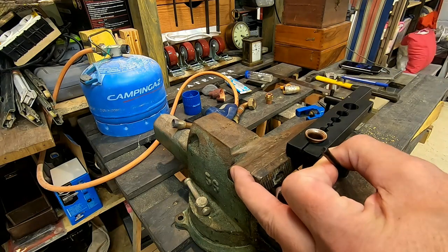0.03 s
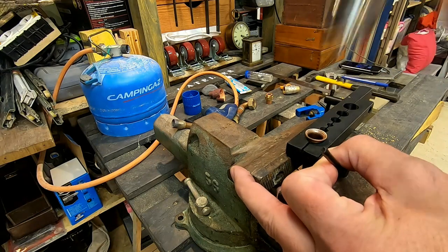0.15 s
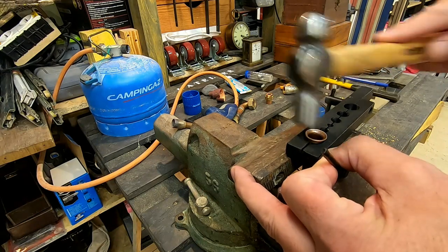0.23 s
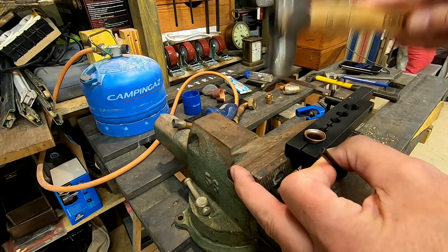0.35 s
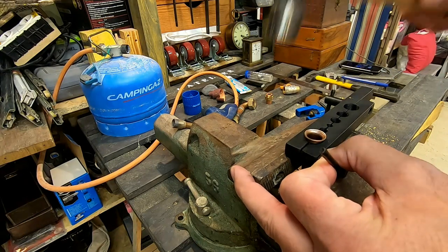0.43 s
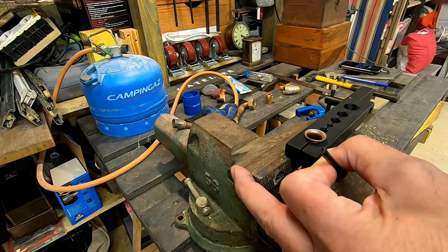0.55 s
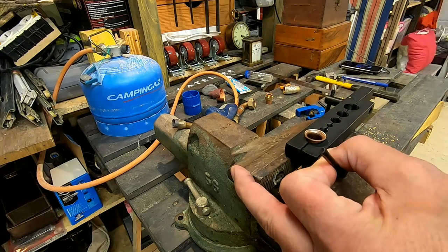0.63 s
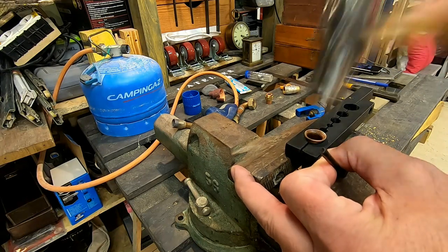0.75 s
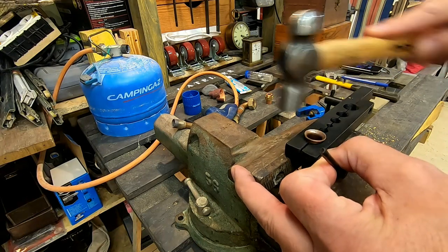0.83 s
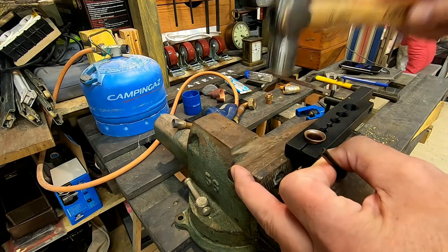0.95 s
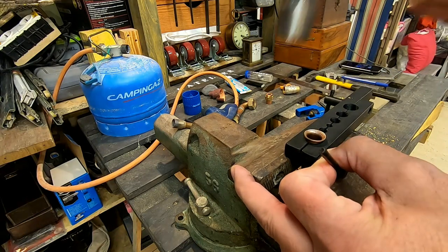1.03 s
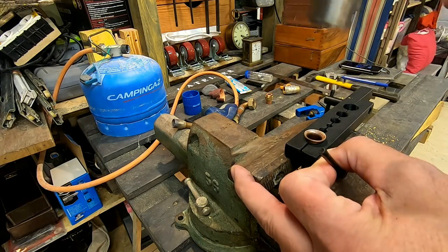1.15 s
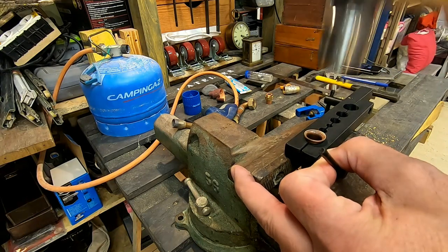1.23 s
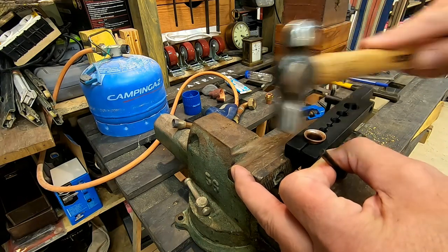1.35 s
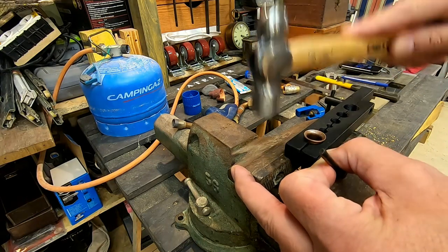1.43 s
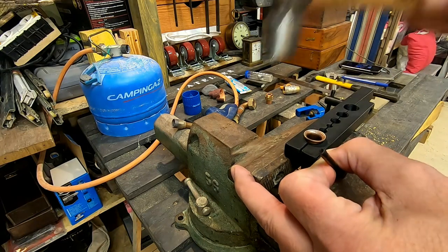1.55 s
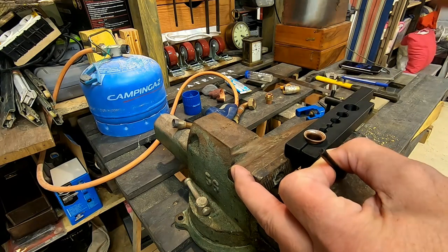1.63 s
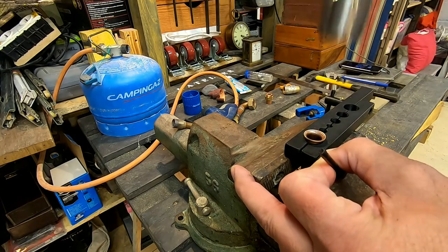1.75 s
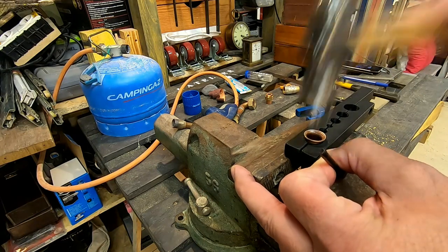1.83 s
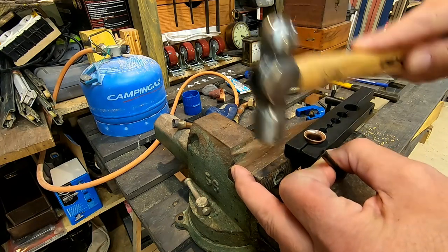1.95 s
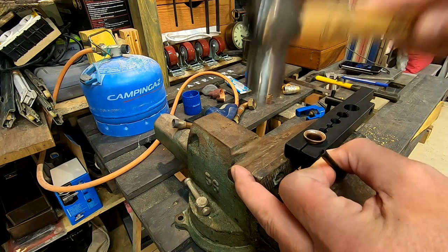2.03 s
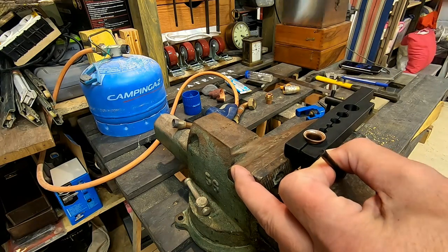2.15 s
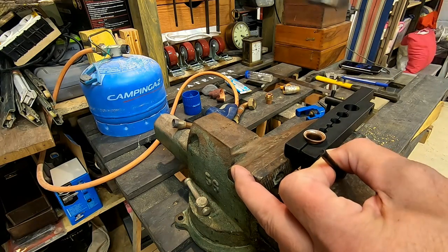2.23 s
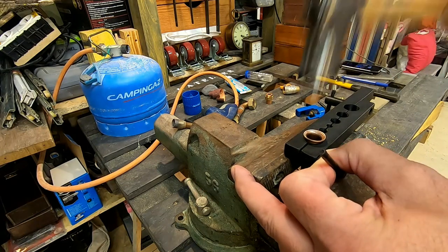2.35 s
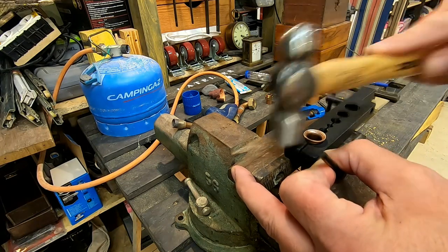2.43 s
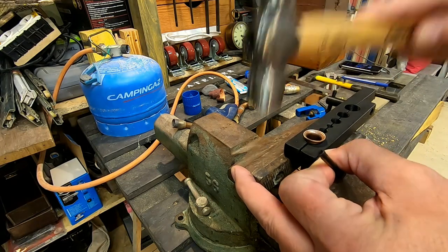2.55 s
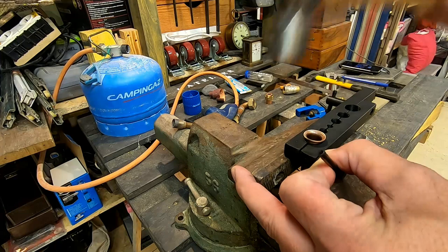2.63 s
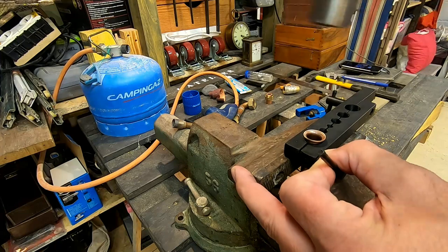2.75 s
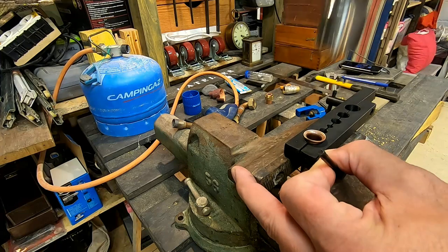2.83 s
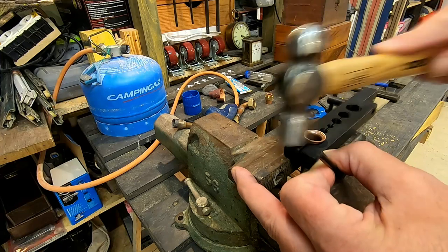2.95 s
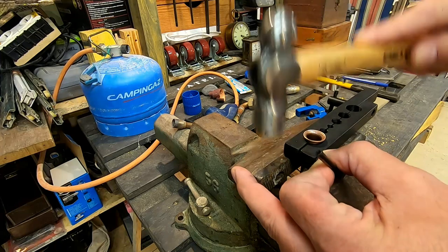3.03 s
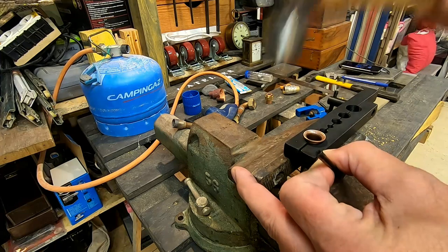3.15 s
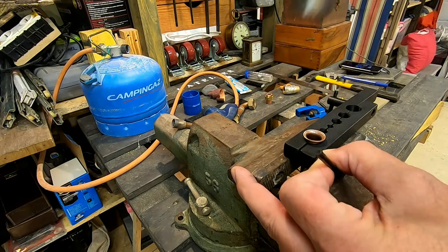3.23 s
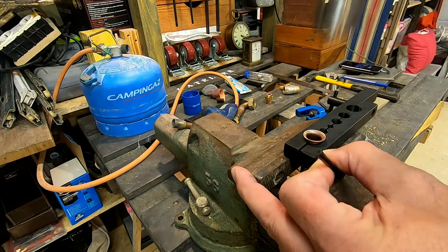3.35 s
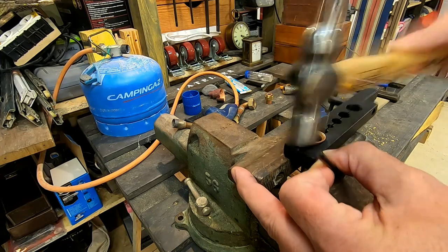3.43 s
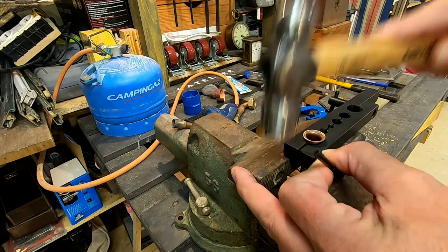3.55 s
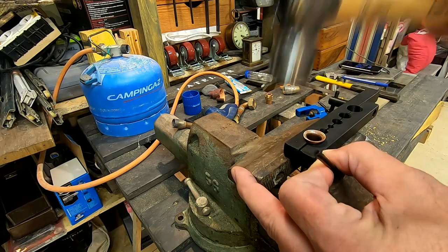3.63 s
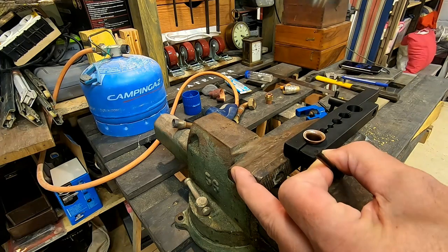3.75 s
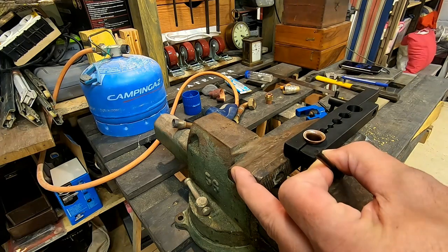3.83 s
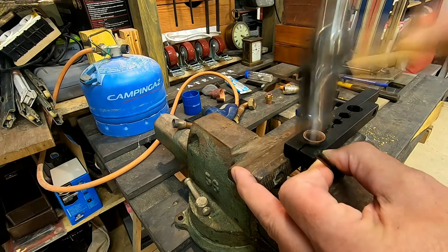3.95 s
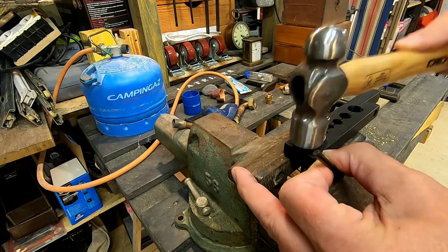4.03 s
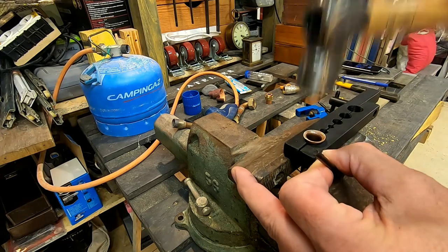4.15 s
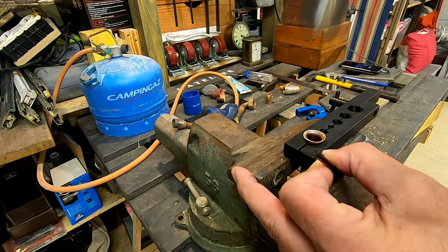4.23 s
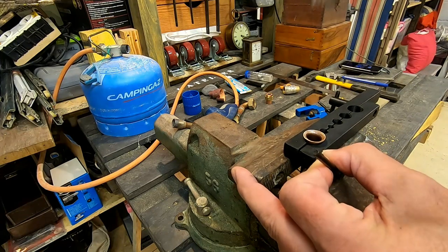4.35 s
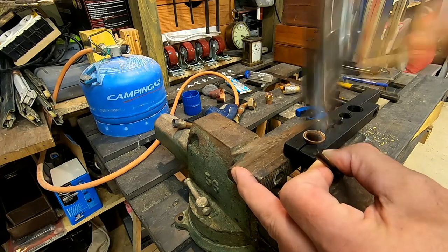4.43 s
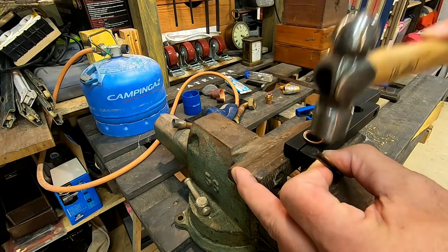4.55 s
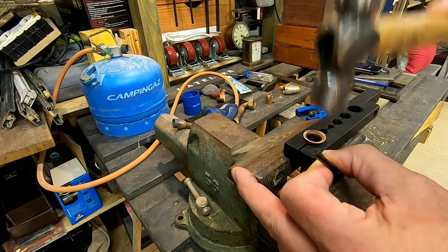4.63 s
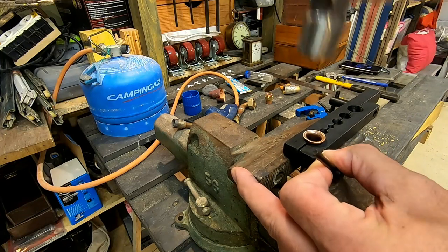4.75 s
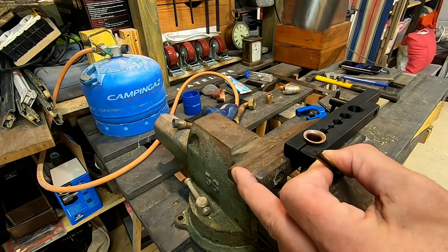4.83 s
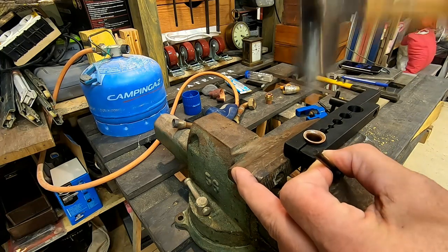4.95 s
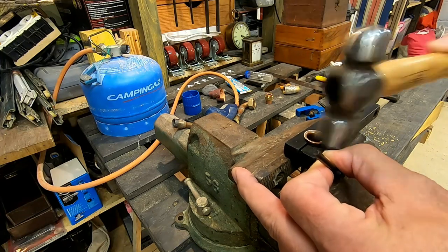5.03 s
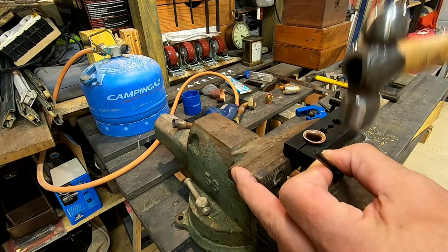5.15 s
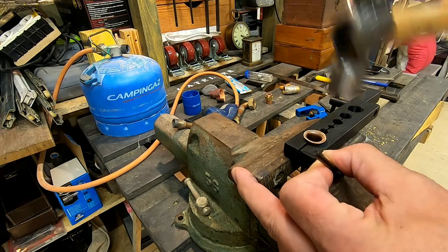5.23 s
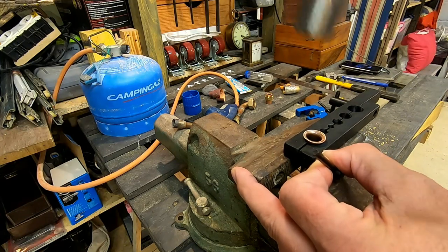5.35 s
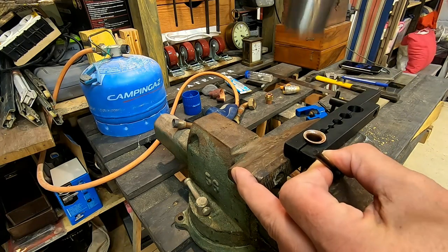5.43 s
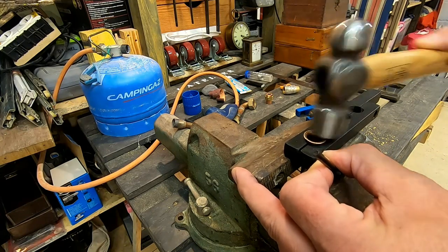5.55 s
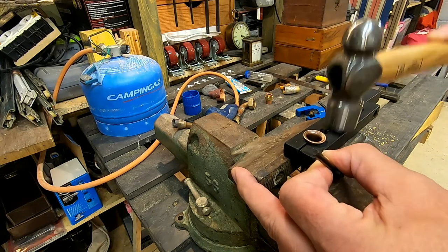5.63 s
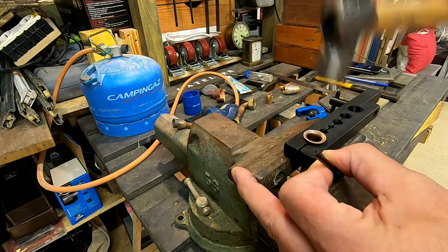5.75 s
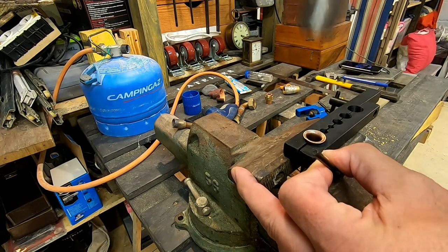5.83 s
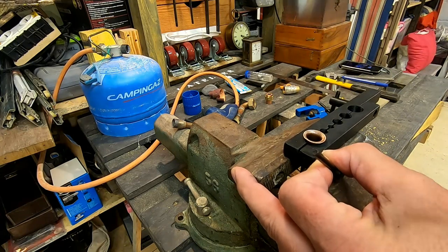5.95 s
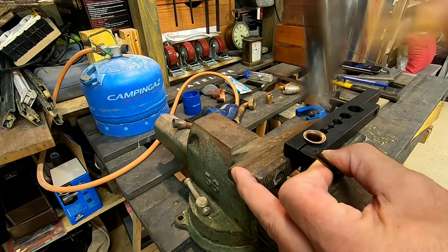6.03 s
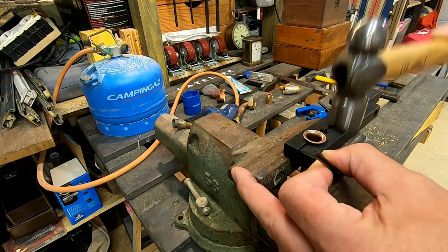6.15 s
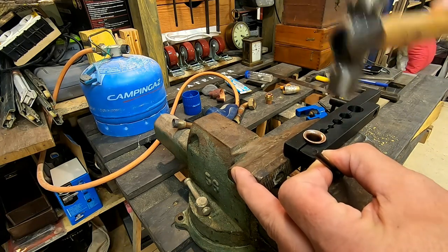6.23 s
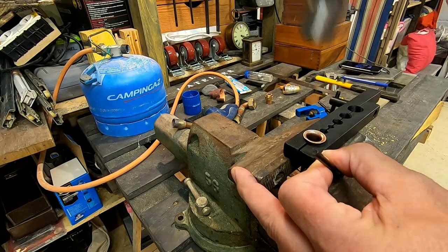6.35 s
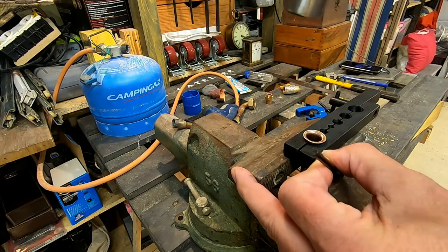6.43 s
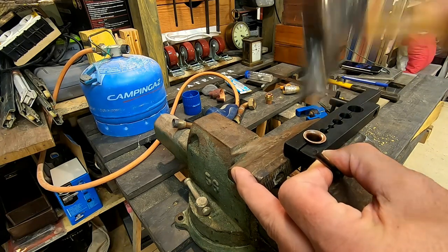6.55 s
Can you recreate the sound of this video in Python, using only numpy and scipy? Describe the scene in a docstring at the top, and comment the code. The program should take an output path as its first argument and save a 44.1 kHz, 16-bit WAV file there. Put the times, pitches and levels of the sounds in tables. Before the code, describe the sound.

Steady, sharp hammer blows on clamped metal, about two a second, each with a short clank, rattling clamp clinks and a dull bench knock.

```python
"""A small steel hammer flares the end of a copper tube held in a steel clamp in a bench vice: twelve blows.
Each blow layers shaped noise for crack, clank and room over the decaying sines of rig and hammer head.
After most, the clamp chatters in the jaws: short noise bursts and sines of its own.
The bench rocks in dull noise knocks, small things on it rattle, and loose tools ring on as faint sines.
Underneath, all noise: steady workshop air, a hand rustle that swells and fades, a thin flickering hiss."""
import sys
import numpy as np
from scipy import signal
from scipy.fft import rfft, irfft
from scipy.io import wavfile

SR = 44100
rng = np.random.default_rng(int(sys.argv[2]) if len(sys.argv) > 2 else 0)


def to_wav(sig):
    """Store sig (one row per channel, or 1-D mono) as 16-bit WAV at the path in sys.argv[1].

    Samples outside -1..1 are clipped; the rate is SR.
    """
    pcm = np.clip(np.atleast_2d(sig), -1, 1) * 32767
    pcm = np.round(pcm).astype(np.int16)
    wavfile.write(sys.argv[1], SR, pcm.T)  # frames by channels


N = 290178
SPAN = 32768  # samples for one contact to die away
AGE = np.arange(SPAN) / SR  # seconds since the contact
BODY_HZ, CLANG_HZ, EDGE_HZ = 1420, 2900, 6200  # where one contact differs in colour from the next


def from_db(db):
    """Decibels to gain."""
    return 10 ** (np.asarray(db) / 20)


def at_hz(points, hz):
    """Read a table on a log-frequency axis."""
    known_hz, values = np.transpose(points)
    return np.interp(np.log(np.maximum(hz, 1)), np.log(known_hz), values)


def add(out, s, sound):
    """Mix a sound in from a given time in seconds."""
    start = int(round(s * SR))
    size = max(0, min(sound.shape[-1], N - start))
    out[:, start:start + size] += sound[:, :size]


# left level minus right level: [f/Hz, level/dB]
LEFT_OVER_RIGHT = [(60, -3.4), (170, -3.8), (330, -6), (520, -9), (820, -8), (970, -1.5), (1900, -3.5),
                   (3000, -1.7), (4200, -2), (5800, -4.5), (9000, 2.5), (13000, -1.4)]
# phase by which the left side leads: [f/Hz, phase/rad]
LEFT_LEAD = [(170, -.15), (330, -.2), (600, .35), (950, 1.2), (1400, .7), (1900, 1.1), (2700, .6),
             (4400, .3), (5500, -.3), (8000, -.6), (10500, -1.5), (12500, -2.1)]


def panned(hz):
    """Complex left and right gains: the two sides differ in level and phase at each frequency."""
    half = np.array([[.5], [-.5]])
    level = from_db(at_hz(LEFT_OVER_RIGHT, hz) * half)
    phase = at_hz(LEFT_LEAD, hz) * half
    return level * np.exp(1j * phase)


# left-right likeness of near sound, before panning: [f/Hz, correlation]
NEAR_LIKENESS = [(200, 0.96), (700, 0.3), (1500, .98), (3000, .94), (6000, 0.76), (10000, .65)]
# left-right likeness of diffuse sound, before panning: [f/Hz, correlation]
DIFFUSE_LIKENESS = [(170, .98), (350, .88), (700, .5), (1500, .45), (3000, .6), (6000, .45), (10000, .3)]


def noise(spectrum, likeness, size, colour=((1, 0), (2, 0))):
    """Stereo noise: a spectrum levelled to unit rms gain, then tinted by a colour in dB and panned."""
    hz = np.arange(size // 2 + 1) * SR / size
    gain = from_db(at_hz(spectrum, hz))
    gain = gain / np.sqrt(np.mean(gain ** 2))
    gain = gain * from_db(at_hz(colour, hz))
    alike = np.clip(at_hz(likeness, hz), -1, 1)
    mid, side = rfft(rng.standard_normal((2, size)))
    opposite = np.array([[1], [-1]])
    pair = np.sqrt((1 + alike) / 2) * mid + np.sqrt((1 - alike) / 2) * side * opposite
    return irfft(pair * gain * panned(hz), size)


def fade(t60, rise_s, hold_s=0):
    """Swell, hold, then die away exponentially."""
    swell = np.minimum(AGE / rise_s, 1) ** 2
    decay_db = -60 * np.maximum(AGE - hold_s, 0) / t60
    return swell * from_db(decay_db)


def mode_shapes(modes, rise_s):
    """One decaying stereo sine a mode, each starting at a random phase of its own."""
    shapes = []
    for hz, db, t60 in modes:
        turns = hz * AGE + rng.random()
        sine = np.real(panned(hz) * np.exp(2j * np.pi * turns))
        shapes.append(from_db(db) * fade(t60, rise_s) * sine)
    return np.array(shapes)


def ring(modes, shapes, colour, scatter_db):
    """Each contact strikes every mode with a strength of its own."""
    strength_db = at_hz(colour, np.array(modes)[:, 0]) + scatter_db * rng.standard_normal(len(modes))
    return np.tensordot(from_db(strength_db), shapes, axes=1)


# still air of the workshop: [f/Hz, relative level/dB per Hz]
STILL_AIR = [(15, -39), (25, -7), (95, -18), (181, 1.5), (264, -6), (415, -11), (488, -15), (729, -12.5),
             (952, -12), (1350, -13.5), (1760, -16.5), (5140, -30), (7090, -26), (11200, -45),
             (15000, -60.5)]
# rustle of the hands: [f/Hz, relative level/dB per Hz]
HAND_RUSTLE = [(100, -6.5), (250, 1), (600, -7), (1400, -0.5), (3200, -10), (4500, -20.5), (10000, -25.5),
               (12000, -38.5)]
# the hands shift on clamp and handle: [middle t/s, length/s, peak level/dB]
HAND_SHIFTS = [(0.275, .18, -60), (.58, 0.38, -69.5), (1.27, 0.18, -69.5), (2.98, 0.56, -63.5),
               (4.5, 3, -71.5), (6.25, .6, -68.5)]
# thin flickering hiss: [f/Hz, relative level/dB per Hz]
THIN_HISS = [(5500, -38), (6600, -4), (7200, 3), (7800, -9), (9000, -40)]


def background():
    """Still air, hands whose rustle swells and fades with each shift, and a hiss of random flickering level."""
    t = np.arange(N) / SR
    movement = np.zeros(N)
    for middle_s, length_s, db in HAND_SHIFTS:
        swell = np.cos(np.pi * np.clip((t - middle_s) / length_s, -.5, .5))
        movement += from_db(db) * swell
    hands = movement * noise(HAND_RUSTLE, DIFFUSE_LIKENESS, N)
    flicker_db = np.interp(t, np.linspace(0, t[-1], num=500), rng.uniform(-12, 12, size=500))
    hiss = from_db(-80.0 + flicker_db) * noise(THIN_HISS, DIFFUSE_LIKENESS, N)
    air = from_db(-68.5) * noise(STILL_AIR, DIFFUSE_LIKENESS, N)
    return air + hands + hiss


# hammer blows, also played by bench():
# [t/s, level/dB, clang level/dB, bright edge level/dB, bench rocking level/dB, rattle level/dB]
HAMMER_BLOWS = [(0.336, 2, -2.5, -0.5, 3, -20), (0.904, 1.6, -3, 1, -1.5, -18),
                (1.438, -0.14, -1.2, 5, -11.5, 3.5), (1.983, 0.44, 1.7, 2.5, -4.5, -7.5),
                (2.521, 1.6, 1, 3.5, 5.5, -4), (3.05, -1.1, .6, 2.5, 1.5, 5.5),
                (3.553, -1.3, 4, 0, -3, 2.5), (4.087, -2.1, 2, 0, -14.5, 2.5),
                (4.569, -0.4, 0.3, -1.3, -0.5, 4), (5.121, -0.5, -3.5, -3, -4, 2),
                (5.66, -2, -0.2, -7, -6, 1), (6.183, -1.5, 1.5, -4, -3, 1.5)]
# bench, vice, clamp and tube under a blow: [f/Hz, relative level/dB, t60/s]
RIG_MODES = [(81.6, -32, 0.17), (163.6, -10.5, 0.19), (170.2, -28.5, 0.72), (327.2, -13, .25),
             (516, -24, 0.24), (760, -17, 0.23), (832.6, -13.5, 0.27), (970, -19.5, 0.27),
             (1245, -18.5, 0.26), (1330, -17, 0.23), (1415, -14.5, 0.17), (1606, -15, 0.15),
             (1903, -11.5, 0.25), (2668, -7.5, 0.22), (2830, -14, 0.086), (3050, -16.5, 0.14),
             (3190, -10.5, 0.13), (4120, -13, 0.18), (4422, -19, .22), (4940, -19.5, .14),
             (5350, -22, 0.097), (5660, -24.5, 0.11), (6700, -28.5, 0.2)]
# thin ping of the hammer head: [f/Hz, relative level/dB, t60/s]
HEAD_MODES = [(10690, -34, .38), (11900, -41, .19), (12060, -40, .2), (12310, -39, .19), (12450, -41, .17),
              (13324, -44, .33), (14100, -50, .15)]
# dense clank of the blow, also the bench's rattle: [f/Hz, relative level/dB per Hz]
CLANK_SPECTRUM = [(30, -24), (110, -21), (170, 5.5), (320, -3), (420, -13.5), (780, 4.5), (1100, -11),
                  (1400, -1.5), (2100, 3), (2800, 3.5), (3700, -4), (4500, -2), (10000, -22.5),
                  (14500, -39.5)]
# bright crack of contact, also the clamp's: [f/Hz, relative level/dB per Hz]
CRACK_SPECTRUM = [(300, -24), (2000, -6), (4500, 1), (7500, -2), (10000, -10.5), (15000, -21)]
# first answer of the room: [f/Hz, relative level/dB per Hz]
ROOM_SPECTRUM = [(35, -16), (110, -16), (200, 1.5), (420, -8.5), (800, -0.5), (1100, 1), (1450, 4),
                 (2100, -4), (2900, 1), (3800, -8.5), (7000, -14.5), (10200, -24), (11000, -41),
                 (15000, -55.5)]
# late, dark answer of the room: [f/Hz, relative level/dB per Hz]
LATE_SPECTRUM = [(40, -6.5), (115, -24), (170, 9.5), (300, -3.5), (450, -15), (900, -9.5), (1500, -13),
                 (3200, -33), (5000, -31.5), (10000, -35), (12000, -64)]


def hammer():
    """The tube yields for a few ms: a bright crack, a dense clank, the modes of rig and head, then the room."""
    out = np.zeros((2, N))
    rig = mode_shapes(RIG_MODES, rise_s=0.0025)
    head = mode_shapes(HEAD_MODES, rise_s=0.001)
    for s, db, clang_db, edge_db, _, _ in HAMMER_BLOWS:
        colour = [(BODY_HZ, 0), (CLANG_HZ, clang_db), (EDGE_HZ, edge_db)]
        crack = noise(CRACK_SPECTRUM, NEAR_LIKENESS, SPAN, colour)
        crack *= from_db(-17.0) * fade(t60=0.018, rise_s=0.0016, hold_s=0.0015)
        clank = noise(CLANK_SPECTRUM, NEAR_LIKENESS, SPAN, colour)
        clank *= from_db(-7.5) * fade(t60=0.049, rise_s=0.00095, hold_s=0.001)
        modal = from_db(-11.0) * ring(RIG_MODES, rig, colour, scatter_db=2.0)
        ping = from_db(-12.0) * ring(HEAD_MODES, head, colour, scatter_db=1.0)
        room = noise(ROOM_SPECTRUM, DIFFUSE_LIKENESS, SPAN, colour)
        room *= from_db(-14.5) * fade(t60=0.26, rise_s=0.007, hold_s=0.0026)
        late = noise(LATE_SPECTRUM, DIFFUSE_LIKENESS, SPAN)
        late *= from_db(-41.5) * fade(t60=0.71, rise_s=0.021, hold_s=0.04)
        add(out, s, from_db(db) * (crack + clank + modal + ping + room + late))
    return out


# loose tools ringing in sympathy: [f/Hz, relative level/dB, t60/s]
TOOL_MODES = [(1028, -3, 1.3), (1389, -5, .7), (3063, 0, .75), (3155, -1, .55), (4480, 0, .38)]
# blows that set a loose tool ringing: [t/s, relative level/dB, strongest note f/Hz]
SYMPATHETIC_RINGS = [(0.339, -56, 3156), (1.44, -47, 3060), (1.99, -52, 1031), (3.55, -49.5, 1417),
                     (4.57, -53, 1390), (5.12, -40.5, 4480)]
OTHER_NOTES_DB_PER_OCTAVE = 10.5  # the other tools answer less, the further they lie from that note


def loose_tools():
    """Tools on the bench ring on faintly in sympathy, favouring modes near one note."""
    out, shapes = np.zeros((2, N)), mode_shapes(TOOL_MODES, rise_s=0.004)
    for s, db, note_hz in SYMPATHETIC_RINGS:
        colour = []
        for hz, _, _ in TOOL_MODES:
            octaves_away = abs(np.log2(hz / note_hz))
            colour.append((hz, db - OTHER_NOTES_DB_PER_OCTAVE * octaves_away))
        add(out, s, ring(TOOL_MODES, shapes, colour, scatter_db=3.5))
    return out


ROCK_DELAY_S, ROCK_PERIOD_S, ROCK_DB, ROCK_LOSS_DB = .12, .11, -38.5, 12.5  # loss is per rock
SECOND_FOOT_S, SECOND_FOOT_DB = .029, -7.5  # after and relative to the first foot


def rocking(rock_db, count):
    """Delay and level of each knock: the bench lands on one foot, then another, weaker with every rock."""
    knocks = []
    for k in range(count):
        for foot_s, foot_db in [(0, 0), (SECOND_FOOT_S, SECOND_FOOT_DB)]:
            delay_s = ROCK_DELAY_S + k * ROCK_PERIOD_S + foot_s
            knocks.append((delay_s, ROCK_DB + rock_db - k * ROCK_LOSS_DB + foot_db))
    return knocks


RATTLE_DELAY_S, RATTLE_GAP_S, RATTLE_JITTER_S = .19, .036, .006
RATTLE_DB, RATTLE_LOSS_DB = -56.5, 2  # loss is per tick


def rattling(rattle_db, count):
    """Delay and level of each tick in a short, uneven, dying run."""
    ticks = []
    for k in range(count):
        delay_s = RATTLE_DELAY_S + k * RATTLE_GAP_S + RATTLE_JITTER_S * rng.standard_normal()
        ticks.append((delay_s, RATTLE_DB + rattle_db - k * RATTLE_LOSS_DB))
    return ticks


# dull knock of the rocking bench: [f/Hz, relative level/dB per Hz]
SHUDDER_SPECTRUM = [(60, -12), (125, -21.5), (170, 2.5), (280, -0.5), (420, -17), (1000, -16), (1700, -26),
                    (3000, -37), (9000, -89.5)]
KNOCK_TREBLE_DB, KNOCK_TREBLE_PER_DB = 1, 1.02  # harder rocking knocks brighter


def bench():
    """What each blow stirs up: dull double knocks of the rocking bench and ticks of the small things on it."""
    out = np.zeros((2, N))
    for s, *_, rock_db, rattle_db in HAMMER_BLOWS:
        colour = [(300, 0), (600, KNOCK_TREBLE_DB + KNOCK_TREBLE_PER_DB * rock_db)]
        for delay_s, db in rocking(rock_db, count=3):
            knock = noise(SHUDDER_SPECTRUM, DIFFUSE_LIKENESS, SPAN, colour)
            knock *= fade(t60=0.22, rise_s=0.007, hold_s=0.012)
            add(out, s + delay_s, from_db(db) * knock)
        for delay_s, db in rattling(rattle_db, count=3):
            tick = noise(CLANK_SPECTRUM, DIFFUSE_LIKENESS, SPAN)
            tick *= fade(t60=0.12, rise_s=0.0031, hold_s=0.003)
            add(out, s + delay_s, from_db(db) * tick)
    return out


# the clamp jumps and lands again: [t/s, level/dB, body level/dB, bright edge level/dB, zing level/dB]
CLAMP_LANDINGS = [(1.4683, -0.5, -1, -1.9, 3.5), (1.5055, -2.4, 4, 6, 8.5), (2.0215, -5, -1.5, 6, 4),
                  (2.0467, -8, 1, 3, 3), (2.5649, -1.85, -0.56, 1, 4), (2.5841, -10, 7, 2, 2.5),
                  (3.065, -14.5, 1.5, -1, 2.5), (3.0814, -2.2, -2, 1.5, 8.5),
                  (3.1027, -0.9, -1, -0.5, -7.5), (3.582, -8, -1.3, 3, -9.5), (3.6104, -2, -1.5, 2.5, -9.5),
                  (3.627, -16.5, 9, 1, -4.5), (4.1118, -4, 3.5, 1.5, -10.5), (4.147, -8, 1, -10, -8.5),
                  (5.1523, -5.5, 2.2, -9.5, -3), (5.6912, -4.5, 4, -9, -11), (6.2148, -5, -8, -10.5, -11),
                  (6.261, -9, 0.5, -7.5, -13)]
# the clamp ringing on its own as it lands: [f/Hz, relative level/dB, t60/s]
CLAMP_MODES = [(791, -20, .12), (1440, -10, .11), (1500, -14, .1), (2690, -10, .08), (2900, -12, .08),
               (4200, -20, .05), (5750, -15, .11), (5790, -19, .16), (9850, -27, .07)]
# short buzzing clink and its echo: [f/Hz, relative level/dB per Hz]
CLINK_SPECTRUM = [(40, -26.5), (170, -15.5), (500, -12.5), (800, -6.5), (1100, -5.5), (1450, 3.5),
                  (2100, -2), (2750, 3.5), (3600, -3), (4500, -5.5), (8000, -21.5), (10000, -19.5),
                  (11500, -33), (15000, -39.5)]
ZING_HZ = 5700  # the clamp's high notes


def chatter():
    """Steel lands on steel: a crack, a short buzzing clink with no weight behind it, and its echo in the room."""
    out, shapes = np.zeros((2, N)), mode_shapes(CLAMP_MODES, rise_s=0.00043)
    for s, db, body_db, edge_db, zing_db in CLAMP_LANDINGS:
        colour = [(BODY_HZ, body_db), (CLANG_HZ, 0), (EDGE_HZ, edge_db)]
        modal_colour = [(BODY_HZ, body_db), (CLANG_HZ, 0), (ZING_HZ, zing_db)]
        crack = noise(CRACK_SPECTRUM, NEAR_LIKENESS, SPAN, colour)
        crack *= from_db(-14.5) * fade(t60=0.008, rise_s=0.0012, hold_s=0.00064)
        clink = noise(CLINK_SPECTRUM, NEAR_LIKENESS, SPAN, colour)
        clink *= from_db(-9.5) * fade(t60=0.04, rise_s=0.0015, hold_s=0.0033)
        modal = from_db(-10.0) * ring(CLAMP_MODES, shapes, modal_colour, scatter_db=3.5)
        room = noise(CLINK_SPECTRUM, DIFFUSE_LIKENESS, SPAN, colour)
        room *= from_db(-21.5) * fade(t60=0.21, rise_s=0.01, hold_s=0.014)
        add(out, s, from_db(db) * (crack + clink + modal + room))
    return out


def scene():
    """Blows, ringing tools, settling bench and chatter over the quiet of the workshop."""
    return background() + hammer() + loose_tools() + bench() + chatter()


def soft_onsets(x, first_db, second_db):
    """Every sound is heard faintly just ahead of itself, in two early copies."""
    lead = int(.0107 * SR)
    padded = np.pad(x, ((0, 0), (0, 2 * lead)))
    one_step_early = padded[:, lead:lead + N]
    two_steps_early = padded[:, 2 * lead:]
    return x + from_db(first_db) * one_step_early + from_db(second_db) * two_steps_early


def record(dry):
    """The loudest peaks are rounded off, the onsets smear a little, and the top is cut."""
    rounded = dry / (1 + dry ** 6) ** (1 / 6)
    smeared = soft_onsets(rounded, first_db=-25.0, second_db=-34.5)
    low_pass = signal.cheby2(14, 60, 16200, fs=SR, output="sos")  # 60 dB down from 16200 Hz up
    return signal.sosfilt(low_pass, smeared)


dry = scene()
out = record(dry)
to_wav(out)
```